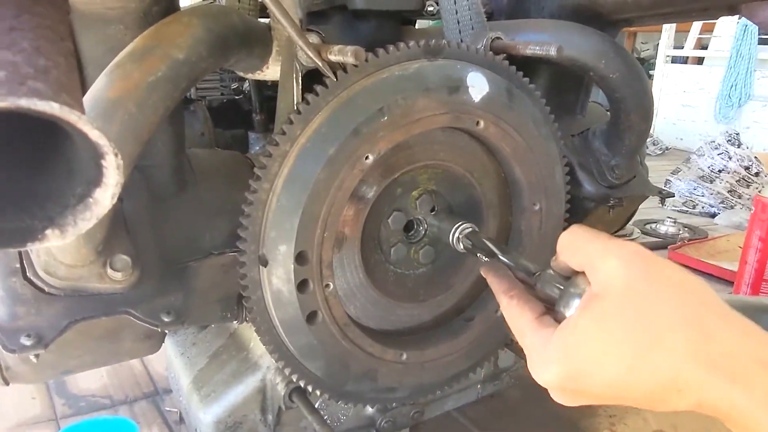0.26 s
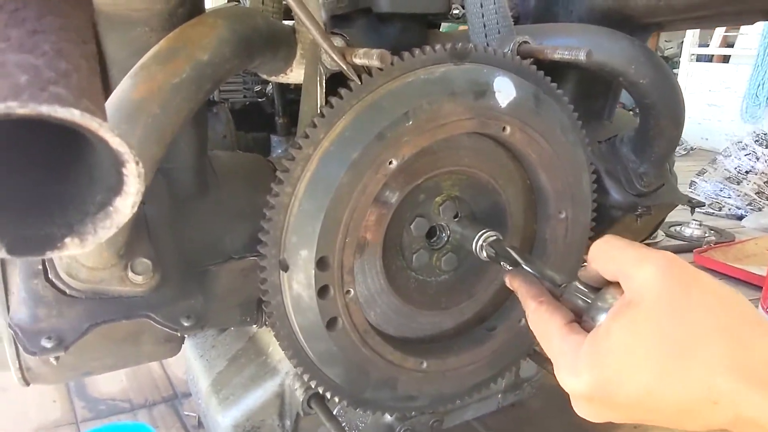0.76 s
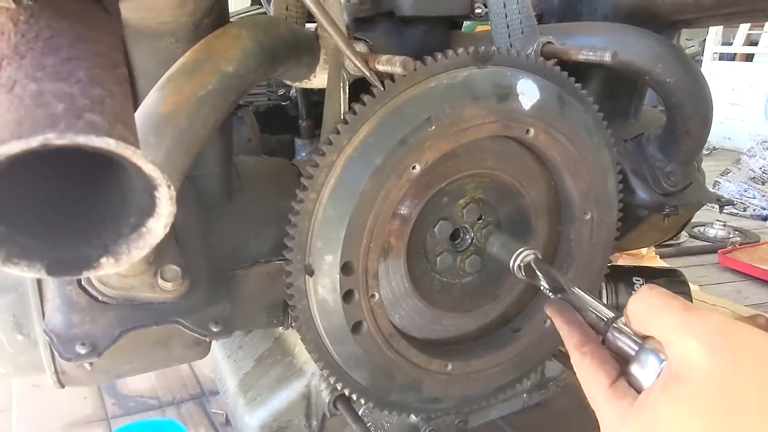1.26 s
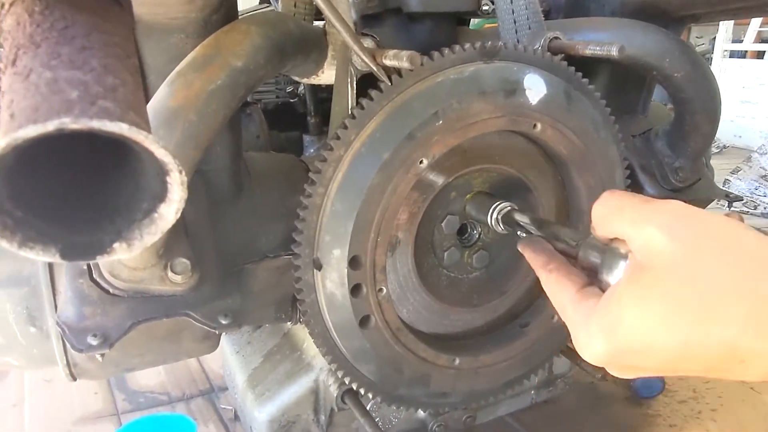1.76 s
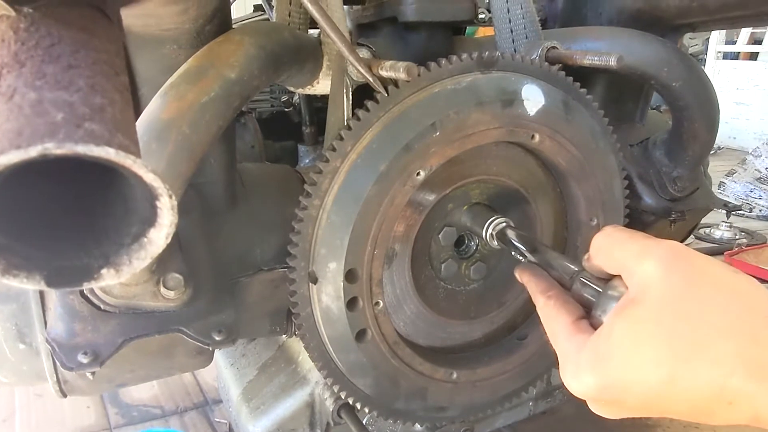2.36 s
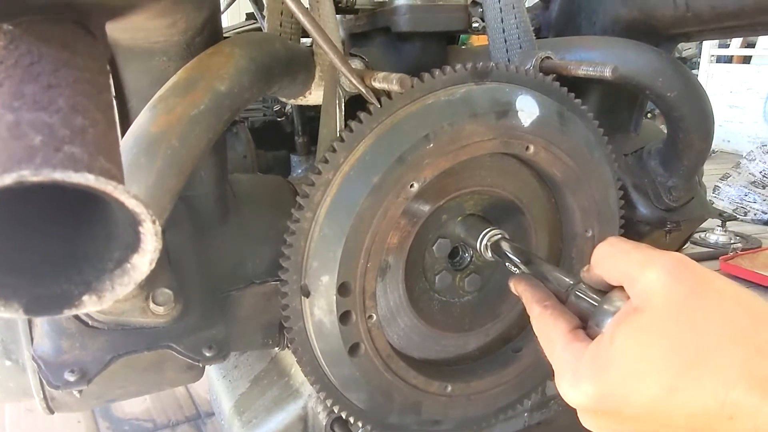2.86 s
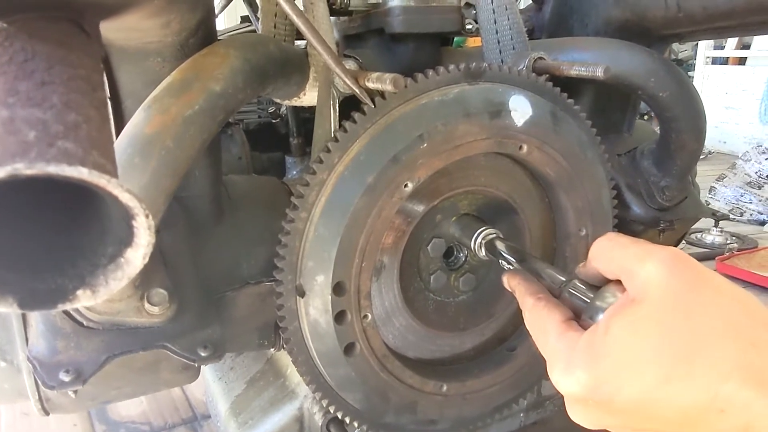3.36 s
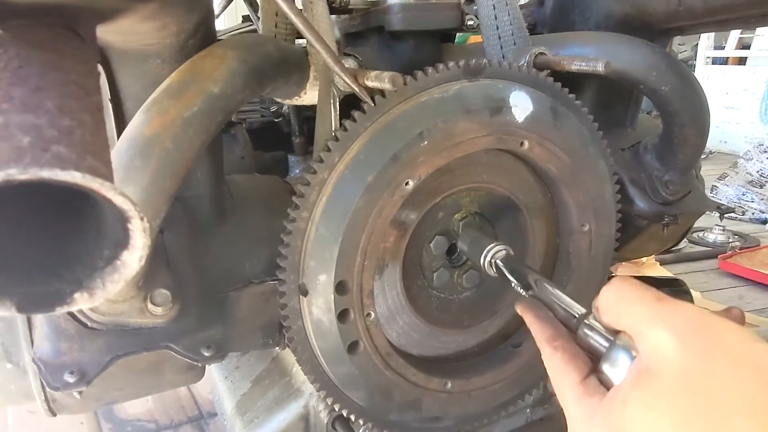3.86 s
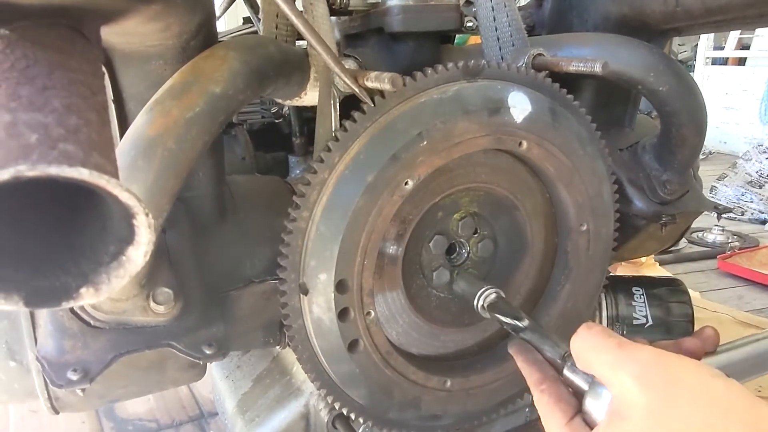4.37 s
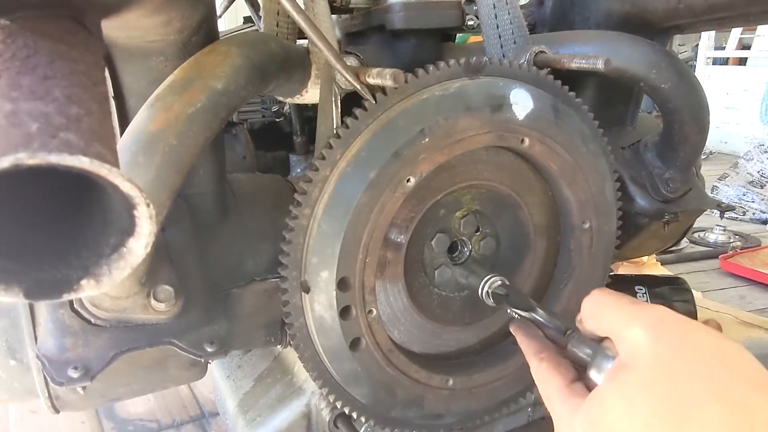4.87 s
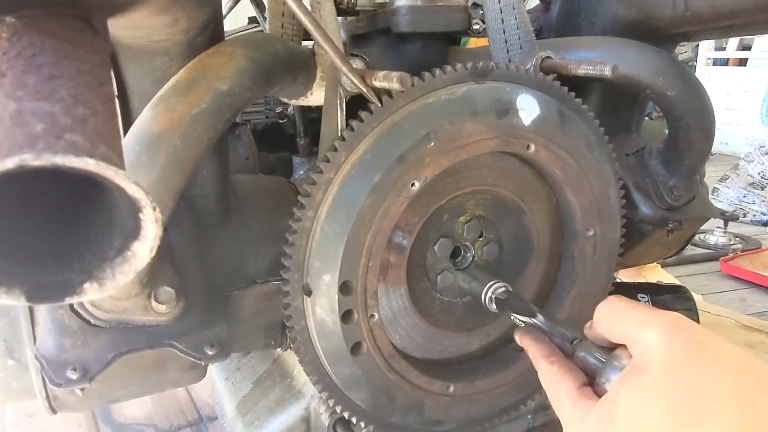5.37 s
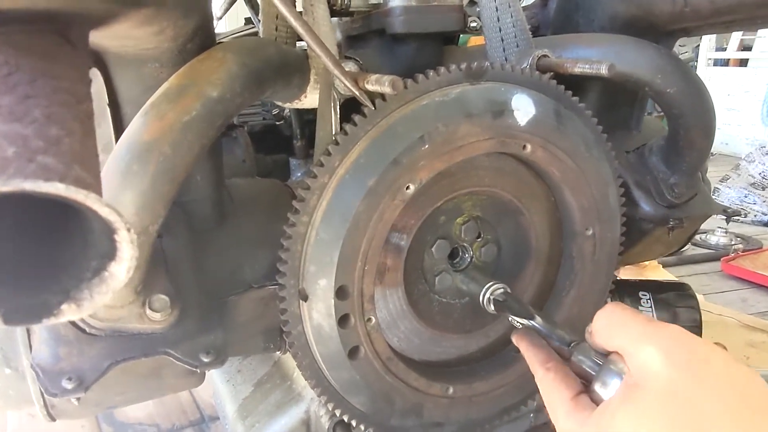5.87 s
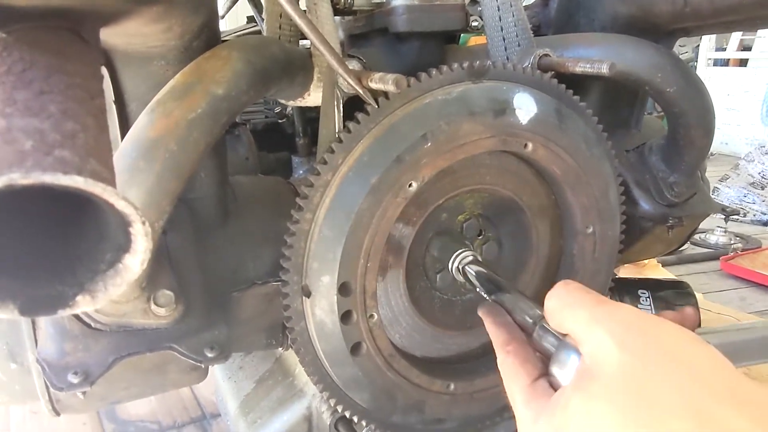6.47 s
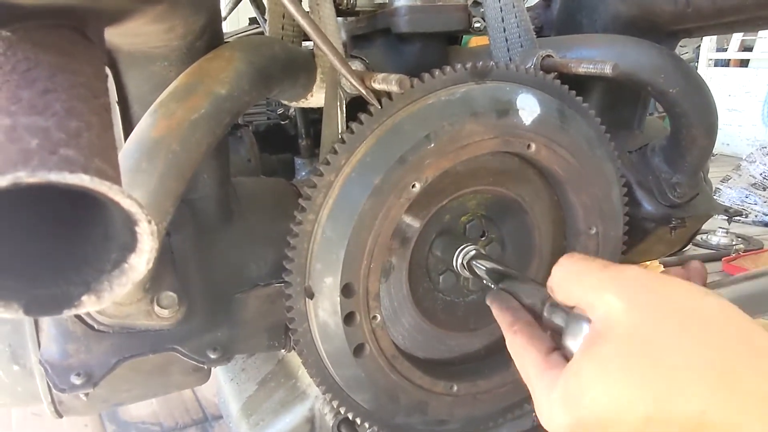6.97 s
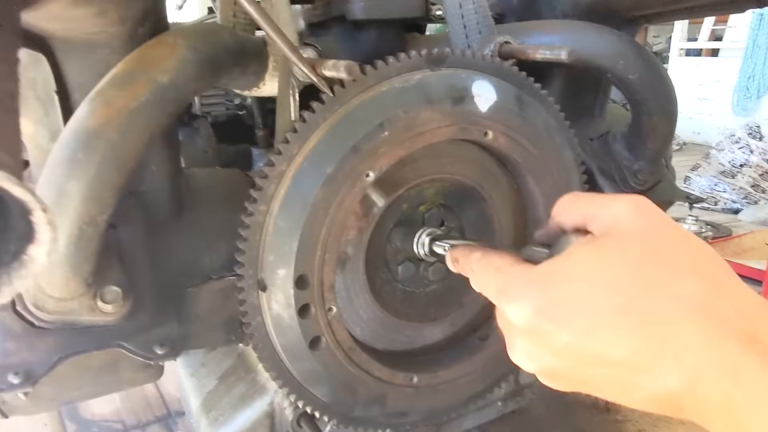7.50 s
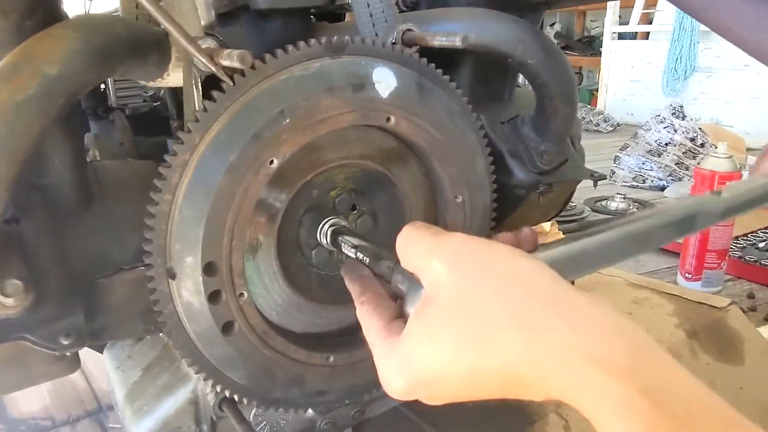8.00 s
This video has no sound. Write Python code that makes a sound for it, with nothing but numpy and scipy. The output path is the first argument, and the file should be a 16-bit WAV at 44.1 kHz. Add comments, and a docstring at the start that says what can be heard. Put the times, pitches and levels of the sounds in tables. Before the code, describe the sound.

A torque wrench cracks sharply on flywheel bolts three times, with knocks and ratchet clicks, over a steady throbbing engine hum in an open garage.

```python
"""A torque wrench cracks, resets, knocks and ratchets on flywheel bolts, close to a phone in an open garage.
An engine idles nearby; a belt-driven unit on it hums a little lower, so the two tones throb over rumble and air.
Contacts are chattering noise plus decaying steel partials, each answered by a noise tail of the garage;
the engine and unit are sine orders on one speed curve, the background is coloured noise.
The phone's two ports colour the sound and add hiss; its gain ducks and soft-clips the loud cracks."""
import sys
import numpy as np
from scipy import signal
from scipy.fft import rfft, irfft, next_fast_len
from scipy.io import wavfile
from scipy.ndimage import uniform_filter1d, map_coordinates

SR = 44100
rng = np.random.default_rng(int(sys.argv[2]) if len(sys.argv) > 2 else 0)


def to_wav(s):
    """Save 16-bit WAV."""
    ch = np.atleast_2d(s).T  # columns
    pcm = np.round(np.clip(ch, -1, 1) * 32767)  # PCM
    wavfile.write(sys.argv[1], SR, pcm.astype(np.int16))


N = 363384

BITE_S = .008  # faint first touch ahead of each contact
# left-right correlation of the near sounds: (frequency [Hz], correlation [-1..1])
NEAR_CORRELATION = [(200, .93), (400, .92), (700, 0.95), (1400, 0.074), (3000, 0.017), (4500, 0.06),
                    (6800, 0.27), (11000, 0.42), (15000, 0.15)]
# engine speed and loudness: (time [s], strongest order [Hz], level [dB])
ENGINE_SPEED = [(0.0, 136.84, -41.5), (0.4, 134.1, -39.7), (1.2, 134.0, -40), (2.0, 133.62, -41.3),
                (2.4, 132.1, -40.2), (3.2, 133.2, -39), (3.6, 133.0, -36.7), (4.0, 132.54, -37.9),
                (4.4, 127.45, -39.9), (4.8, 128.03, -39.1), (5.2, 129.76, -38.1), (6.0, 132.2, -39.5),
                (6.8, 133.55, -42.1), (8.24, 133.6, -43.2)]


def amp(db):
    """Amplitude factor of a level in dB."""
    return 10 ** (np.asarray(db) / 20)


def unit(x):
    """x scaled to an RMS of 1 over both channels."""
    return x / np.sqrt(np.mean(x ** 2) + 1e-20)


def along(points, hz):
    """(Hz, value) points interpolated on a log frequency axis."""
    f, v = np.transpose(sorted(points))
    return np.interp(np.log(hz + 1), np.log(f + 1), v)


def curves(rows):
    """One value per sample for each column after the time."""
    time_s, *columns = np.transpose(rows)
    return [np.interp(np.arange(N) / SR, time_s, column) for column in columns]


def wobble(knots_per_s):
    """Smooth random curve through normally distributed knots."""
    knots = rng.standard_normal(int(N * knots_per_s / SR) + 4)
    return map_coordinates(knots, [np.arange(N) * knots_per_s / SR])


def filtered(x, response):
    """x with its spectrum multiplied by response(Hz)."""
    n = x.shape[-1]
    m = next_fast_len(n + 4096)
    return irfft(rfft(x, m) * response(np.fft.rfftfreq(m, 1 / SR)), m)[..., :n]


def half_turn(correlation, hz):
    """Angle [rad] that splits a sound into mid and side for a given left-right correlation."""
    return np.arccos(np.clip(along(correlation, hz), -1, 1)) / 2


def hiss(size, colour_db, correlation):
    """Stereo noise: independent mid and side, weighted for the colour and the left-right correlation."""
    def split(hz):
        angle = half_turn(correlation, hz)
        return amp(colour_db(hz)) * [np.cos(angle), np.sin(angle)]

    mid, side = filtered(rng.standard_normal((2, size)), split)
    return np.array([mid + side, mid - side])


def wrench():
    """Steel contacts at set times, shaded in the treble, each with its own answer from the garage."""
    # event tables: (time [s], level [dB], thud [dB], treble tilt [dB/octave])
    # wrench breaks over at its set torque
    breaks = [(0.613, -8, -4, 0), (3.276, -11.5, 0, 2), (5.5114, -8, -8.5, -1)]
    # pawl drops back as the pull eases
    resets = [(0.853, -12.5, -3, -2.5), (3.4715, -12, 3, 2.5), (5.7294, -14, -1, 1),
              (6.4198, -18, -1.5, 3.5)]
    # ratchet teeth click over
    teeth = [(0.4484, -33, 4.5, 2), (0.7841, -42, 12, -0.5), (2.7227, -52, 12, 0.5),
             (5.1387, -37, 2.5, -0.5), (6.4453, -21.5, 15, 0.5), (6.9456, -17, 4.5, 4),
             (7.6266, -13, 0, 0.5), (7.6784, -12.5, -6, 0), (7.7413, -12, -6, 1.5),
             (7.8271, -15, 1.5, -0.5), (8.0122, -32.5, 3, -2.5)]
    # socket knocks on bolt heads
    knocks = [(0.0304, -54, 14.5, -3.5), (1.0864, -51, -5, -1.5), (1.497, -26, 0, -3.5),
              (1.5055, -28, 12.5, -1), (1.5549, -32, -5.5, 0.5), (1.7644, -38, 14, -3.5),
              (1.8357, -8.5, -3, 1.5), (1.9904, -42.5, 7, -5), (2.0844, -55.5, 17, -6),
              (3.7044, -44.5, -16.5, -2), (3.7179, -41.5, -16, -0.5), (4.1265, -20, -11, -2.5),
              (4.3191, -38.5, 14.5, -10), (4.3574, -46.5, 15, -8), (4.368, -41, 14, -8.5),
              (4.4144, -34.5, -6.5, -10), (4.4308, -35, -10, -7.5), (4.4608, -22.5, -25.5, -2),
              (4.4692, -29, 0, 2), (4.6942, -10, -5, 0.5), (4.6984, -12.5, 4, 2), (4.9482, -43.5, -5, -11),
              (5.0704, -50, -1, -4), (6.7514, -47, 7, -11), (6.8264, -40, 11, 0), (7.2614, -51, 11, -3),
              (7.442, -27, 4.5, 2), (7.4724, -17, 7.5, -2.5), (8.1754, -45.5, 8, -6.5),
              (8.203, -54.5, 10, -8)]
    # socket slides and rubs: the same columns, then length [ms]
    scrapes = [(1.486, -30.5, -6, -9, 16), (2.74, -64.5, 7, 9.5, 45), (4.45, -45.5, -4.5, -6.5, 6.6),
               (5.828, -40.5, 2.5, -0.5, 60), (6.884, -53.5, 14, -1.5, 30), (7.598, -54, 5.5, 5.5, 14),
               (7.816, -31, -11, 7, 5.7)]
    # contact kinds: (level per band [dB], pan [dB], chatter [ms], ring [dB], echo [dB])
    break_kind = ([-14, -13, -6.5, -0.5, 0.5, -2, 11.5, 5, 2], 8.3, 3, -1.3, -10.5)
    reset_kind = ([-21, -23.5, -11.5, -1, -6, -11, 1, -5, -15], 5.5, 2.6, 2.2, -11)
    tooth_kind = ([-22, -16.5, -18.5, 1, -1, 2, 0.5, 4, -1.5], 4.1, 3.2, 0, -14)
    knock_kind = ([-8, -3.5, -7, 4, -6.5, -2, -1.5, -8, -13.5], 2.3, 2.3, 1, -14.5)
    # the same without the chatter column
    scrape_kind = ([-18.5, -11.5, -7, 0, -1.5, -2, -5, -8, -16.5], 3.9, -17, -4)
    # centres of the level bands: [Hz]
    bands_hz = (400, 700, 1400, 2600, 4500, 5600, 6800, 8300, 12500)
    # part of the thud level added in each band: [share]
    thud_share = (.8, 0.91, .55, 0, 0, 0.17, 0, 0.058, 0)
    # the phone shades only the treble: (frequency [Hz], share of the side gains [1])
    shadow = [(900, 0), (2000, .5)]

    groups = ((breaks, break_kind), (resets, reset_kind), (teeth, tooth_kind), (knocks, knock_kind))
    blows = [(row, *kind) for rows, kind in groups for row in rows]
    rubs = [(row, *scrape_kind[:2], length_ms, *scrape_kind[2:]) for *row, length_ms in scrapes]
    tilt_octaves = np.log2(np.maximum(bands_hz, bands_hz[3]) / bands_hz[3])
    out = np.zeros((2, N + 2 * SR))
    for event, bands_db, pan_db, chatter_ms, ring_db, echo_db in blows + rubs:
        time_s, level_db, thud_db, tilt_db = event
        levels_db = level_db + np.add(bands_db, thud_db * np.array(thud_share)) + tilt_db * tilt_octaves
        near = contact(list(zip(bands_hz, levels_db)), chatter_ms, ring_db)
        sides_db = [pan_db - 4.5, 3.5 - pan_db]  # left, right
        near = filtered(near, lambda hz: amp(np.outer(sides_db, along(shadow, hz))))
        far = signal.fftconvolve(near[:, :SR // 8], garage_tail(size=SR * 2 // 3), axes=1)
        start = round((time_s - BITE_S) * SR) - 20
        out[:, start:start + near.shape[1]] += near
        echo_start = start + 260  # samples; first wall about a metre away
        out[:, echo_start:echo_start + far.shape[1]] += amp(echo_db) * far
    return out[:, :N]


def contact(colour, chatter_ms, ring_db):
    """Steel bites and chatters as gritty noise, while the parts ring as decaying partials of random strength."""
    # colour of a crack: (frequency [Hz], level [dB])
    crack_colour = [(150, -33.5), (400, -1.5), (750, 22.5), (1350, 9.5), (2500, 16.5), (3200, 9.5),
                    (3900, 5.5), (4500, 9), (5500, 6), (6800, 9.5), (8000, 7.5), (10500, 1), (13000, 2.5),
                    (15600, 0), (16400, -19.5)]
    # flywheel, socket and wrench body: (frequency [Hz], level [dB], t60 [s])
    steel = [(408, -6, 0.25), (436, -11.5, 0.36), (599.6, -12.5, 0.33), (603, -21.5, 0.27),
             (694, -8.5, 0.17), (754.3, -6, 0.12), (854, -8.5, 0.11), (1030, -22, 0.044),
             (1120, -12.5, 0.24), (1610, -11, .07), (1920, -10, 0.12), (2106, -15, 0.1),
             (2690, -17.5, 0.12), (2774, -12.5, 0.043), (2980, -17, 0.14), (3890, -23.5, .08),
             (4530, -13.5, 0.17), (4710, -16, .08), (5450, -25.5, .06), (6400, -19.5, 0.18),
             (6860, -25.5, 0.22), (7050, -34, 0.067), (7740, -35.5, 0.08), (8830, -19, .08)]

    t = np.arange(SR // 4) / SR - BITE_S
    after = np.maximum(t, 0)
    bite_db = 3500 * np.minimum(t, 0) - 27 * np.exp(-after / .0003)
    held = amp(-60 * np.maximum(t - chatter_ms / 1000, 0) / 0.026)
    # single touches under 1 ms apart
    grit = amp(14.8 * uniform_filter1d(rng.standard_normal(len(t)), size=36))
    noise = hiss(len(t), lambda hz: along(crack_colour, hz) + along(colour, hz), NEAR_CORRELATION)
    crack = amp(bite_db - 3.5) * held * grit * noise

    hz, part_db, t60_s = np.transpose(steel)[..., None]
    chance = rng.standard_normal((len(steel), 3))  # strength, phase, leading side
    swell = 1 - np.exp(-after / (0.00029 + 1.5 / hz))  # heavy parts take a few cycles to speak
    struck_db = 3 * chance[:, :1]
    decay = amp(-60 * after / t60_s) + 0.68 * held
    level = amp(ring_db + part_db + along(colour, hz) + struck_db) * swell * decay
    # loose parts smear each ring: random-walk phase
    blur = (.02 + 3.5e-5 * hz) * np.cumsum(rng.standard_normal((len(steel), len(t))), 1)
    phase = 2 * np.pi * (hz * t + chance[:, 1:2]) + blur
    lead = half_turn(NEAR_CORRELATION, hz) * np.sign(chance[:, 2:])  # each part leads at one port
    return crack + [np.sum(level * np.sin(phase + side * lead), 0) for side in (1, -1)]


def garage_tail(size):
    """Noise answer of near walls, a weaker longer yard and a farther wall; the first two decay per frequency."""
    # colour of the walls' answer: (frequency [Hz], level [dB])
    echo_colour = [(200, -3), (500, -4), (1300, 0.5), (2100, -0.5), (2700, -7.5), (3500, 3), (5300, -2.5),
                   (6700, -7.5), (9000, -3), (16000, 4.5)]
    # base decay, sped up or slowed below: (frequency [Hz], base t60 [s])
    garage_decay = [(300, 0.5), (1000, 1), (2500, 1), (4800, 0.68), (6700, 0.98), (10000, 0.49),
                    (16000, 0.028)]
    wall_delay_s, wall_spread_s, wall_db = .017, 0.0068, -2.5  # farther wall, delay after the first

    noise = hiss(size, lambda hz: along(echo_colour, hz), NEAR_CORRELATION)
    hz, t, spectrum = signal.stft(noise, SR, nperseg=256)
    fall_db = -60 * t / along(garage_decay, hz)[:, None]
    near_walls = amp(2.2 * fall_db)
    yard = amp(0.86 * fall_db - 14)
    far_wall = amp(wall_db) * np.exp(-((t - wall_delay_s) / wall_spread_s) ** 2)
    tail = signal.istft(spectrum * (near_walls + yard + far_wall), SR, nperseg=256)[1][:, :size]
    return tail / np.linalg.norm(tail[0])


def engine():
    """Sine firing orders follow the shaft speed; the weak ones waver in level and phase."""
    # weaker orders: (multiple of the strongest [1], level under it [dB])
    weak_orders = [(.4, -17), (.5, -24), (.6, -26), (.75, -22), (.8, -24), (1.1, -25), (1.2, -13),
                   (1.4, -25), (1.6, -17), (1.8, -24)]
    hz, level_db = curves(ENGINE_SPEED)
    turn = 2 * np.pi * np.cumsum(hz) / SR
    weak = 0
    for multiple, order_db in weak_orders:
        strength = amp(order_db + 0.94 * wobble(1.1))
        weak = weak + strength * np.sin(multiple * turn + 1.9 * wobble(5.2))
    return np.sqrt(2) * amp(level_db) * (np.sin(turn) + weak)


def belt_unit():
    """Sine hum geared to the engine, with harmonics that come and go."""
    # level of the hum: (time [s], level [dB])
    hum_level = [(0, -39.5), (.8, -39), (1.2, -35), (1.7, -39.5), (2.2, -58), (2.85, -39), (4.0, -50),
                 (4.55, -78.5), (5.2, -48.5), (6.0, -38), (6.5, -44), (7.0, -53.5), (8.24, -50.5)]
    # one list each for harmonics 2, 3, 4: (middle [s], peak [dB], half length to 1/e [s])
    harmonic_swells = ([(2.2, -53.5, 0.17), (3.6, -50.5, 0.26), (5.15, -46.5, 0.22), (6.4, -56.5, 0.13),
                       (7.6, -56.5, 0.22)], [(1.9, -61.5, 0.17), (3.3, -56.5, 0.59), (5.55, -57.5, .3),
                       (6.9, -62, 0.27)], [(3.0, -68.5, 0.92), (4.8, -66.5, 0.66), (7.7, -65.5, 0.45)])
    # harmonics 2, 3, 4 between swells: mean level [dB]
    harmonic_steady_db = (-67, -69, -68.5)
    belt_ratio = .8939  # hum over the strongest engine order

    t = np.arange(N) / SR
    turn = 2 * np.pi * belt_ratio * np.cumsum(curves(ENGINE_SPEED)[0]) / SR
    hum = amp(curves(hum_level)[0]) * np.sin(turn)
    for harmonic, (steady_db, swells) in enumerate(zip(harmonic_steady_db, harmonic_swells), start=2):
        swell = sum(amp(db) * np.exp(-((t - mid_s) / half_s) ** 2) for mid_s, db, half_s in swells)
        steady = amp(steady_db + 3.8 * wobble(2.8))
        hum = hum + (steady + swell) * np.sin(harmonic * turn)
    return np.sqrt(2) * hum


def background():
    """Engine rumble and a broad outdoor hiss: two coloured noises with fluttering levels."""
    # spectrum of the rumble: (frequency [Hz], relative density [dB per Hz])
    rumble_colour = [(15, -51), (25, -24), (75, -14.5), (107, -7), (135, -4.5), (184, -13.5), (233, -13),
                     (291, -19.5), (474, -26), (700, -38.5), (910, -68.5), (1540, -120)]
    # spectrum of the air: (frequency [Hz], relative density [dB per Hz])
    air_colour = [(240, -52.5), (400, -15.5), (700, -8.5), (1100, -12.5), (1700, -13.5), (2350, -11.5),
                  (3000, -18.5), (5000, -27), (6600, -25.5), (8500, -29.5), (10800, -35), (13000, -46.5),
                  (16000, -72)]
    # levels before the flutter: (time [s], rumble [dB], air [dB])
    levels = [(0, -49, -53), (.4, -47, -58), (2, -48, -59), (4, -48.5, -57.5), (5.5, -48.5, -58),
              (6.5, -49.5, -57), (8.24, -49.5, -55.5)]
    # left-right correlation: (frequency [Hz], correlation [-1..1])
    far_correlation = [(60, 0.37), (130, 0.82), (290, 0.93), (640, 0.61), (1410, -0.27), (3100, -0.33),
                       (6820, 1), (15000, -0.9)]

    rumble_db, air_db = curves(levels)
    rumble = unit(hiss(N, lambda hz: along(rumble_colour, hz), far_correlation))
    air = unit(hiss(N, lambda hz: along(air_colour, hz), far_correlation))
    rumble_flutter_db = .7 * wobble(5)
    air_flutter_db = 1.2 * wobble(21)
    return amp(rumble_db + rumble_flutter_db) * rumble + amp(air_db + air_flutter_db) * air


def ducked(x):
    """Gain control: loud peaks pull the gain down within some ms; it climbs back steadily."""
    threshold_db, cut_share, attack_s, release_db_per_s = -10, 0.52, 0.012, 58
    climb_db = release_db_per_s * np.arange(N) / SR
    peak_db = 20 * np.log10(np.clip(np.abs(x).max(0), 1e-6, 1))
    cut_db = cut_share * np.maximum(peak_db - threshold_db, 0)
    cut_db = np.maximum(np.maximum.accumulate(cut_db + climb_db) - climb_db, 0)
    size = max(round(attack_s * SR), 2)
    # origin makes the average look back only
    return x * amp(-uniform_filter1d(cut_db, size=size, origin=(size - 1) // 2))


def scene():
    """Sum of the wrench, engine, belt unit and background."""
    return wrench() + engine() + belt_unit() + background()


def record(dry):
    """Phone: hiss and colour at each port, ducking gain, soft clipping, then a band limit."""
    # hiss of the capsules: (frequency [Hz], relative density [dB per Hz])
    capsule_colour = [(9000, -30), (11000, -8), (13000, -2), (15700, 0), (15950, -30)]
    # port colours, half on each side: (frequency [Hz], left-right difference [dB])
    port_colour = [(60, -3.5), (110, -3.5), (200, -2.5), (380, -4), (700, -2), (1290, 0), (2380, 8.5),
                   (4400, 0), (8120, 0), (15000, -7)]
    low_hz, top_hz = 20, 16400

    capsule_hiss = amp(-73.5) * unit(hiss(N, lambda hz: along(capsule_colour, hz), [(1, .1)]))
    x = filtered(dry + capsule_hiss, lambda hz: amp(np.outer([.5, -.5], along(port_colour, hz))))
    x = ducked(x)
    x = x / (1 + np.abs(x) ** 8) ** (1 / 8)  # soft clip towards 1
    return filtered(x, lambda hz: (hz < top_hz) * (hz > low_hz))


dry = scene()
out = record(dry)
to_wav(out)
```